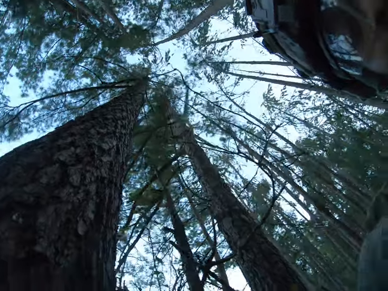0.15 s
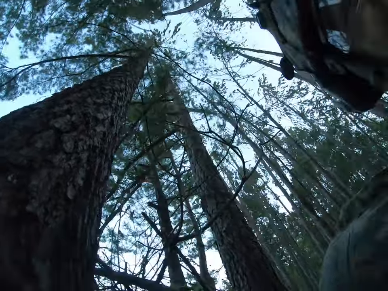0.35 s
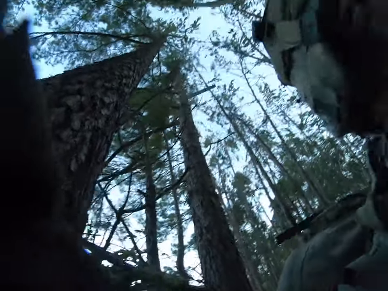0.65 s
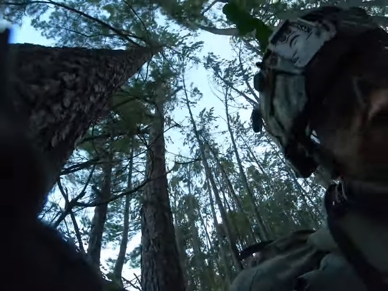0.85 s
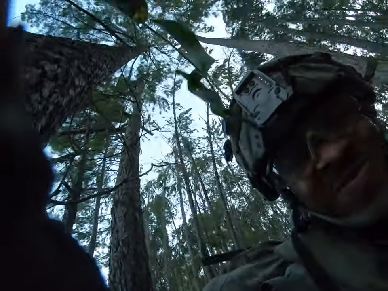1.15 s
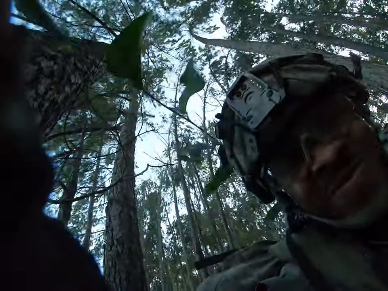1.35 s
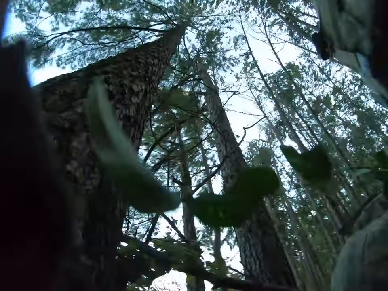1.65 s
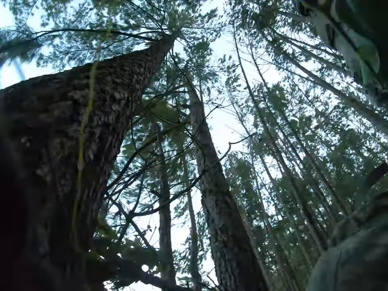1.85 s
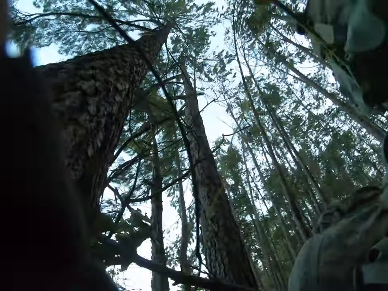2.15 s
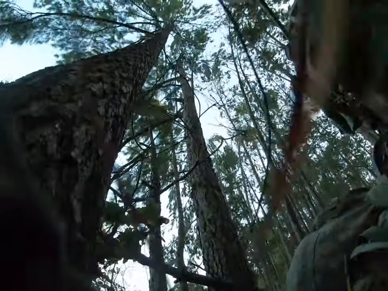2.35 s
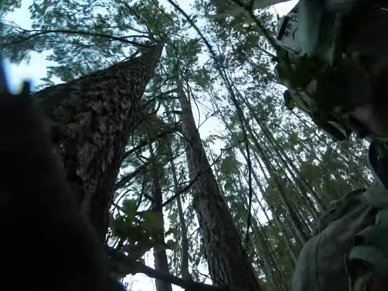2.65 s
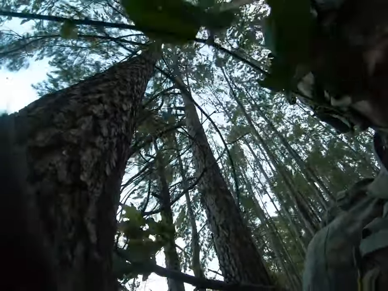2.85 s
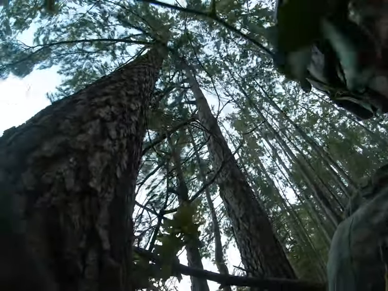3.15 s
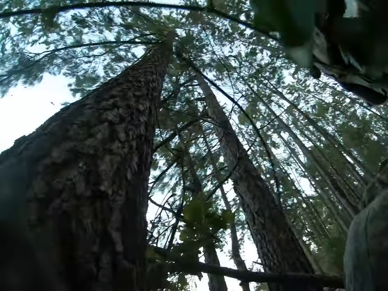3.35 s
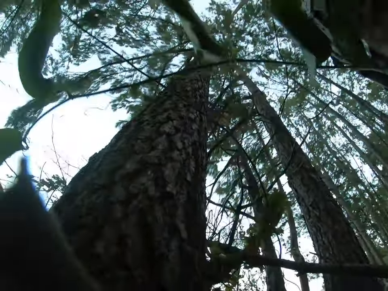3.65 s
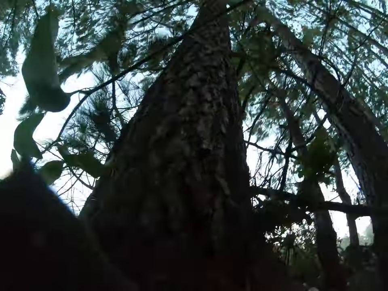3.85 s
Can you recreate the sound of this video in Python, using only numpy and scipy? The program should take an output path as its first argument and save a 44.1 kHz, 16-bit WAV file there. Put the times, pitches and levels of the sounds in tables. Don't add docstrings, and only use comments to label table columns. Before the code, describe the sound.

After a brief silence, heavy helicopter chopping fades in quickly, echoing off trunks and branches; rotor wind roars, turbines whine faintly, then the slaps dull and bits of bark tick the microphone's housing, outdoors in forest.

```python
import sys
import numpy as np
from scipy import signal
from scipy.io import wavfile
from scipy.ndimage import uniform_filter1d

SR = 44100
rng = np.random.default_rng(int(sys.argv[2]) if len(sys.argv) > 2 else 0)


def materialize(psi):
    bounded = np.clip(np.atleast_2d(psi).T, -1, 1)
    quanta = np.round(bounded * 32767).astype(np.int16)
    wavfile.write(sys.argv[1], SR, quanta)


def gain_from_decibels(decibels):
    exponent = np.asarray(decibels, float) / 20
    return 10 ** exponent


N = 176400
T = np.arange(N) / SR

BLADE_PERIOD_S, FIRST_SLAP_S = 0.08881, 0.30605
PULSE_SAMPLES = 1764

# t/s, extra travel time/s
DRIFT = [
    (0, 0),
    (1.82, 0),
    (2.0, .0014),
    (3.0, .0026),
    (4.0, .0055),
]
# t/s, slap level/dB, thump level/dB, slap width/s
OVERLAP = [(.3, 4, 2, 0.00077), (.7, 1.5, 1, 0.00074), (1.3, 2, -4, 0.00091), (1.82, 1, -1, 0.001),
           (1.95, -3, -32, 0.0014), (2.5, -5, 5.5, 0.0011), (2.9, -12, 1, 0.0027), (3.2, -2, -3, 0.00098),
           (3.6, -3.5, 1.5, .0011), (4, -8, -4.5, 0.00099)]
# lead/s, width/s, level/dB, sign
THUMPS = [
    (.0455, 0.0025, -9.5, 1),
    (0.038, .0013, -14.5, -1),
    (0.01004, 0.0036, -11, 1),
    (0.01595, 0.0013, -14.5, -1),
]
# t/s, roar level/dB, trunk echo level/dB, hiss level/dB, whine swell/dB
WASH = [(.3, -15, -13.5, -25, 7.5), (.53, -13.5, -19, -25, 0.5), (.75, -19, -26, -28, -6),
        (1.0, -25, -18.5, -27, -5.5), (1.25, -11.5, -25, -30, -4), (1.5, -18, -20.5, -32.5, -6.5),
        (1.8, -9.5, -18.5, -32, -8), (1.9, -20.5, -12.5, -29.5, -6), (2.05, -15, -11.5, -28.5, -1),
        (2.2, -11, -17, -30.5, -15), (2.4, -15, -18, -32, -14), (2.65, -24, -22, -33.5, -14.5),
        (2.9, -11, -21, -29.5, -6.5), (3.08, -22.5, -22, -31.5, -11.5), (3.3, -17, -22, -29, -3),
        (3.5, -15, -17.5, -30, -9.5), (3.75, -23, -35, -32, -8.5), (4, -14.5, -12, -31, -6.5)]
# f/Hz, level/dB per Hz
ROAR_SPECTRUM = [(8.8, -40), (15, 2), (48, 2), (123, -4.5), (241, -6.5), (369, -12.5), (900, -21.5),
                 (1170, -44), (1980, -120)]
# f/Hz, level/dB per Hz
HISS_SPECTRUM = [(500, -5), (3770, -16), (4100, -19.5), (5640, -25.5), (6400, -38), (8100, -34.5),
                 (9600, -44.5), (10700, -60)]
# f/Hz, level/dB per Hz
TOP_SPECTRUM = [(10000, -5), (11400, -2), (12950, -2), (13150, -11.5), (15600, -19.5)]
WHINE_HZ = [1928, 3865, 5765, 7478, 11520]
# width/Hz, level/dB, share of whine swell followed
WHINE = [(25, -41.5, 0.72), (60, -48, 1.1), (80, -51.5, 1.1), (70.5, -51.5, 0.84), (500, -66.5, 0.8)]
# t/s, level/dB, f/Hz, length/s
TICKS = [(1.9385, -14, 1700, .0006), (1.992, -46, 12500, .0002), (2.1, -34, 7000, .0002),
         (2.159, -10, 1200, .0004), (2.178, -22, 3500, .0004), (2.288, -20, 4000, .0003),
         (2.304, -22, 3500, .0003), (2.5757, -16, 3600, .0003), (2.6457, -15, 8000, .00009),
         (2.937, -22, 4000, .0004), (3.2565, -8, 2300, .00018), (3.2583, -11, 3000, .00016),
         (3.53, -22, 3500, .0004), (3.951, -7, 1450, .0003)]
# t/s, level/dB
BRANCHES = [(.3, -22.5), (.8, -41), (1.3, -24.5), (1.7, -29.5), (1.95, -20.5), (2.3, -27.5), (2.6, -32),
            (3.1, -29.5), (3.4, -33.5), (4, -26)]
# t/s, share 0-1
CLUMPING = [(.3, 0.8), (1.8, .9), (1.9, 0), (2.35, 0.5), (2.5, 0.6), (3.1, 1), (3.5, 1), (3.75, 0.63),
            (4, 0.5)]


def evened(x):
    return x / np.sqrt(np.mean(x ** 2) + 1e-20)


def curve(table, t, axis=1):
    rows = np.array(table)
    return np.interp(t, rows[:, 0], rows[:, axis])


def add(mix, start_s, sound):
    part = mix[max(round(start_s * SR), 0):][:len(sound)]
    part += sound[:len(part)]


def pulse_time():
    return (np.arange(PULSE_SAMPLES) - PULSE_SAMPLES // 2) / SR


def dip(width_s, rise=1):
    u = pulse_time() / width_s
    return (rise * u ** 2 - 1) * np.exp(-u ** 2 / 2)


def blades():
    slap_spread_db, thump_spread_db, jitter_s = 0.7, 5.0, 0.00064
    rebound_s, rebound_width_s, rebound_db = 0.0043, 0.0026, -2.5
    rebound = gain_from_decibels(rebound_db) * np.exp(-((pulse_time() - rebound_s) / rebound_width_s) ** 2)
    out = np.zeros(N)
    for k, luck in enumerate(rng.standard_normal((43, 10))):
        s = FIRST_SLAP_S + (k - 1) * BLADE_PERIOD_S
        s += curve(DRIFT, s) - 0.02
        slap = dip(curve(OVERLAP, s, axis=3), rise=0.68)
        slap_db = curve(OVERLAP, s) + slap_spread_db * luck[0]
        add(out, s, gain_from_decibels(slap_db) * (slap + rebound))
        for j, (lead_s, width_s, db, sign) in enumerate(THUMPS):
            thump_s = s - lead_s + jitter_s * luck[j + 1]
            thump_db = db + curve(OVERLAP, s, axis=2) + thump_spread_db * luck[j + 5]
            add(out, thump_s, gain_from_decibels(thump_db) * np.sign(sign) * dip(width_s))
    return out


def clump():
    clump_db, half_clump_db, lead_s = 2, 2.5, 0.0067
    turn = 2 * np.pi * (T - curve(DRIFT, T) - FIRST_SLAP_S + lead_s) / BLADE_PERIOD_S
    return curve(CLUMPING, T) * (clump_db * np.cos(turn) / 2 + half_clump_db * np.cos(2 * turn))


def scatter(per_s, min_width_s, max_width_s):
    spread_db = 2.5 * np.minimum(rng.exponential(1, N), 3)
    arrives = rng.random(N) < per_s / SR
    size = gain_from_decibels(spread_db + clump()) * arrives
    kind = rng.integers(0, 8, N)
    out = np.zeros(N)
    for k, width_s in enumerate(np.geomspace(min_width_s, max_width_s, num=8)):
        sign = -1 if k % 3 == 0 else 1
        out += signal.oaconvolve(size * (kind == k), dip(width_s) * sign, "same")
    return evened(out)


def trunks():
    trunk = gain_from_decibels(curve(WASH, T, axis=2) - 1) * scatter(170, 0.00071, 0.0027)
    branch = gain_from_decibels(curve(BRANCHES, T)) * scatter(500, 0.00023, 0.0009)
    return trunk + branch


def noise(points, patchy_db, flicker_db, size):
    frames, hz = N // (size // 4) + 5, np.fft.rfftfreq(size, 1 / SR)
    a, b, patch = rng.standard_normal((frames, len(hz), 3)).T
    patch = uniform_filter1d(patch, size=size // 64, axis=0)
    patch = evened(uniform_filter1d(patch, size=12, axis=1))
    flicker = evened(uniform_filter1d(rng.standard_normal(frames), size=5))
    f, db = np.transpose(points)
    colour = np.interp(np.log(hz + 1), np.log(f + 1), db, left=-120, right=-120)
    z = (a + 1j * b) * gain_from_decibels(colour[:, None] + patchy_db * patch + flicker_db * flicker)
    return evened(signal.istft(z, nperseg=size, noverlap=size * 3 // 4)[1][:N])


def downwash():
    roar_db = curve(WASH, T) - 1.5 + 0.81 * clump()
    roar = gain_from_decibels(roar_db) * noise(ROAR_SPECTRUM, patchy_db=2.0, flicker_db=-0.5, size=2048)
    hiss = noise(HISS_SPECTRUM, patchy_db=0.52, flicker_db=0.5, size=512)
    hiss += gain_from_decibels(-47) * noise(TOP_SPECTRUM, patchy_db=1.5, flicker_db=1.5, size=512)
    return roar + gain_from_decibels(curve(WASH, T, axis=3) + 1.5) * hiss


def whine():
    out = np.zeros(N)
    for hz, (width_hz, db, share) in zip(WHINE_HZ, WHINE):
        r = np.exp(-np.pi * width_hz / SR)
        drive = rng.standard_normal(N) + 1j * rng.standard_normal(N)
        slow = signal.lfilter([1 - r], [1, -r], drive)
        tone = evened((slow * np.exp(2j * np.pi * hz * T)).real)
        out += gain_from_decibels(db + share * curve(WASH, T, axis=4)) * tone
    dull = signal.sosfilt(signal.butter(4, 9500, fs=SR, output="sos"), out)
    return gain_from_decibels(2) * dull


def rustle():
    peak_s, length_s, level_db, band_hz = 1.8, 0.16, -72.5, [11500 * 0.83, 15700]
    grain = evened(uniform_filter1d(rng.standard_normal(N), size=150))
    grains = rng.standard_normal(N) * gain_from_decibels(3.5 * grain)
    bright = signal.sosfilt(signal.butter(4, band_hz, "band", fs=SR, output="sos"), grains)
    skew = np.where(T < peak_s, 1, 0.3)
    return gain_from_decibels(level_db) * evened(bright) * np.exp(-((T - peak_s) / length_s / skew) ** 2)


def debris():
    out, t = np.zeros(N), (np.arange(400) - 200) / SR
    for s, db, hz, length_s in TICKS:
        tick = gain_from_decibels(db) * np.exp(-(t / length_s) ** 2) * np.cos(2 * np.pi * hz * t)
        add(out, s - 200 / SR, tick)
    return out + rustle()


def scene():
    return (blades() + trunks() + downwash() + whine() + debris())[None]


def roll_off(x):
    return signal.sosfilt(signal.butter(12, 15700, fs=SR, output="sos"), x)


def record(dry):
    limit_db, recover_db_per_s, squeeze = -5.5, 109.5, 0.99
    open_s, open_length_s, open_power = 0.221, 0.075, 2.1
    x = signal.sosfilt(signal.butter(4, 27, "high", fs=SR, output="sos"), dry)
    level_db = 20 * np.log10(uniform_filter1d(abs(x[0]), size=40) + 1e-9)
    fall_db = T * recover_db_per_s
    held_db = np.maximum.accumulate(level_db + fall_db) - fall_db
    over_db = np.maximum(held_db - limit_db, 0)
    duck_db = squeeze * uniform_filter1d(uniform_filter1d(over_db, size=70), size=70)
    x = x / gain_from_decibels(duck_db)
    x = signal.sosfilt(signal.butter(2, 15, "high", fs=SR, output="sos"), x)
    x = x * np.clip((T - open_s) / open_length_s, 0, 1) ** open_power
    return roll_off(x)


dry = scene()
out = record(dry)
materialize(out)
```